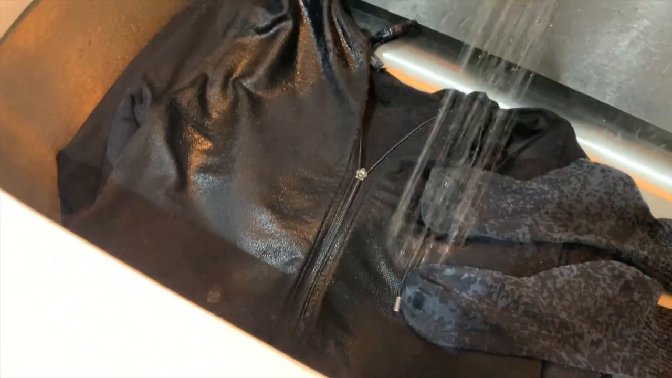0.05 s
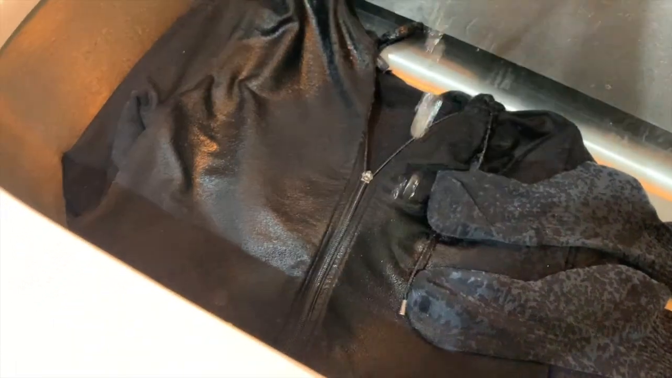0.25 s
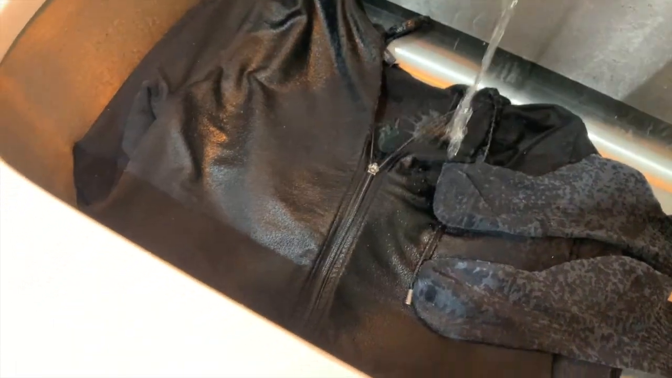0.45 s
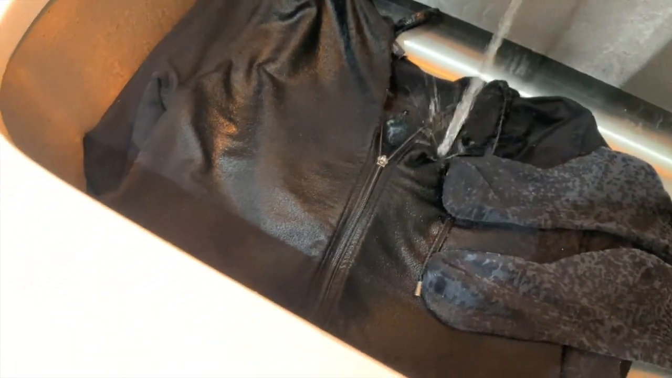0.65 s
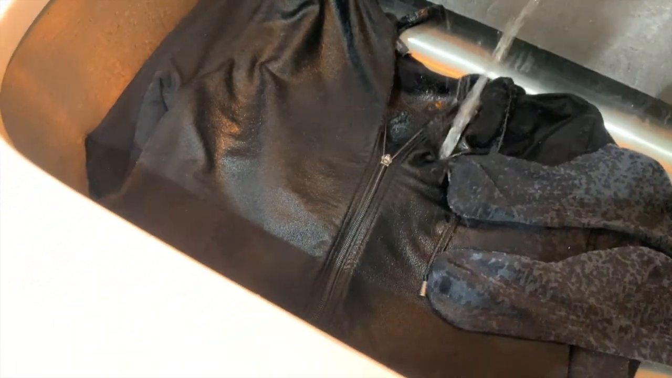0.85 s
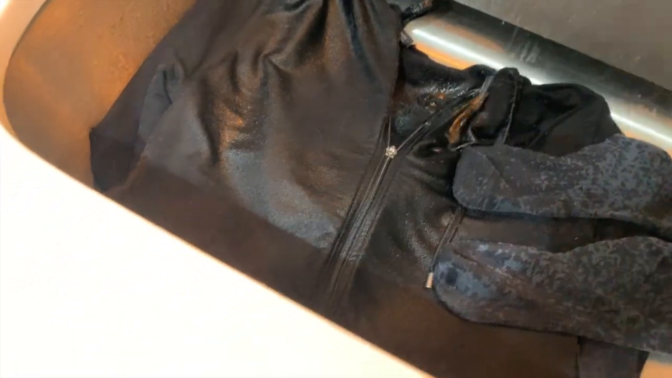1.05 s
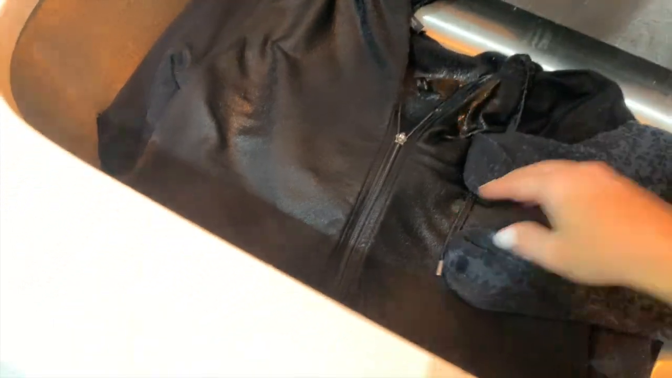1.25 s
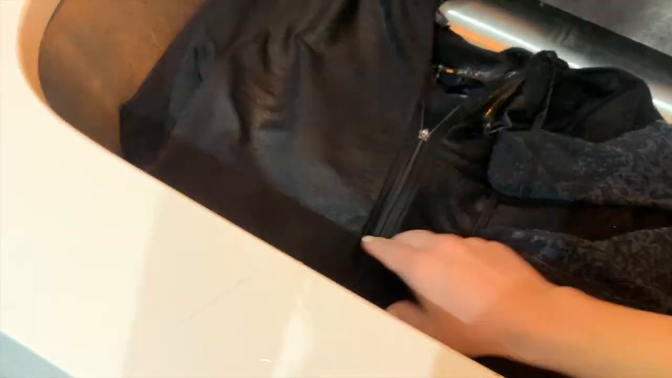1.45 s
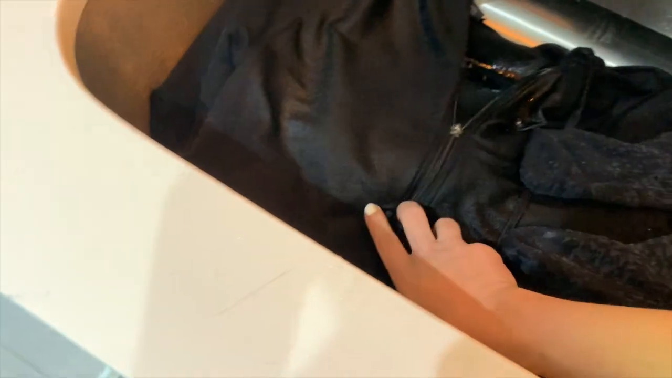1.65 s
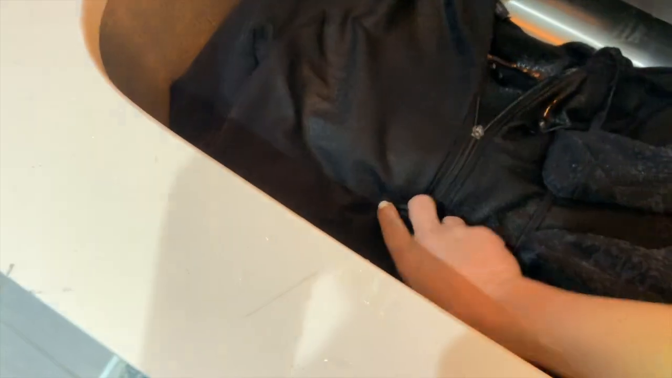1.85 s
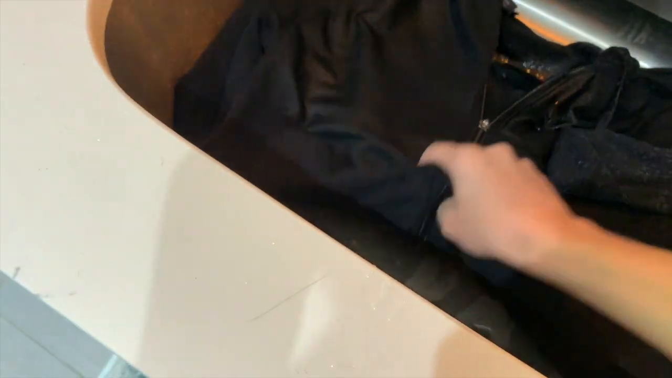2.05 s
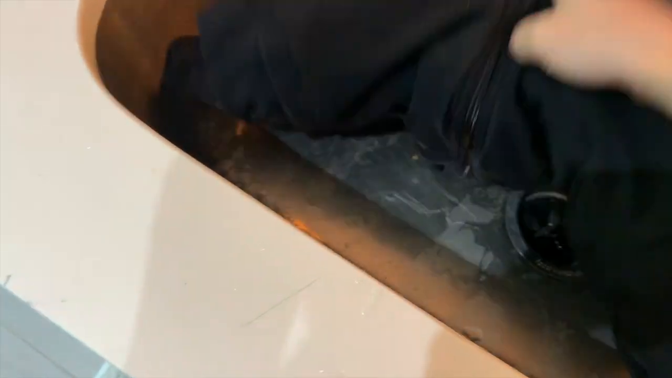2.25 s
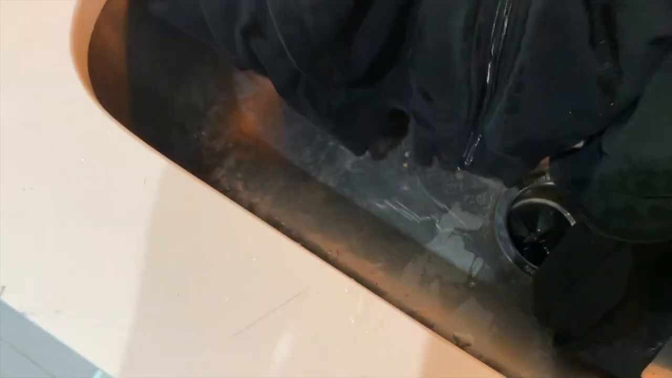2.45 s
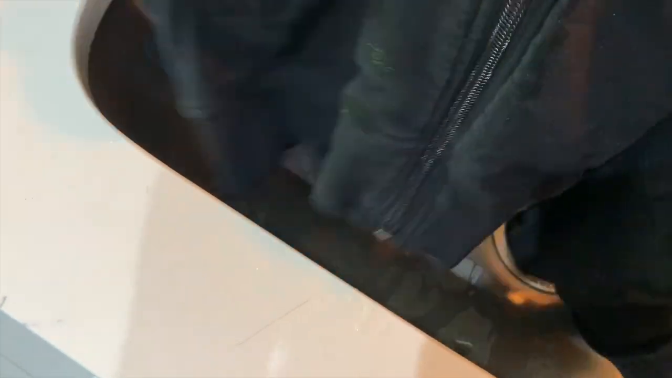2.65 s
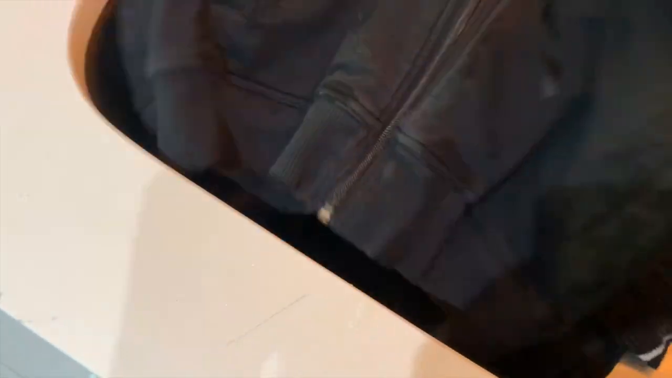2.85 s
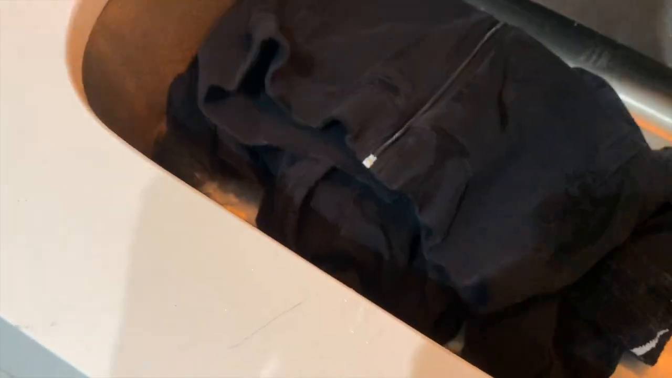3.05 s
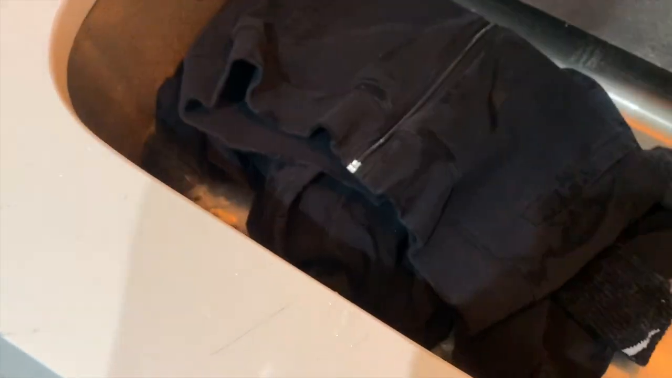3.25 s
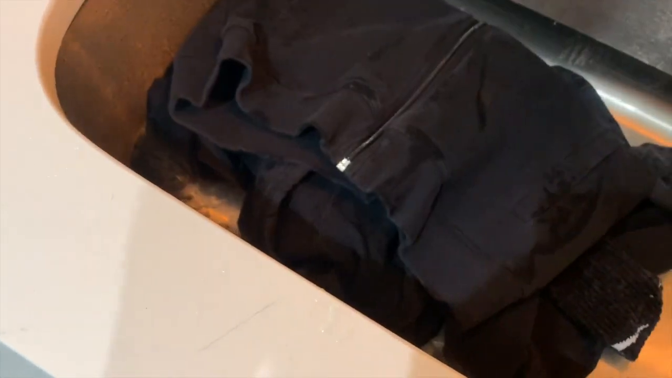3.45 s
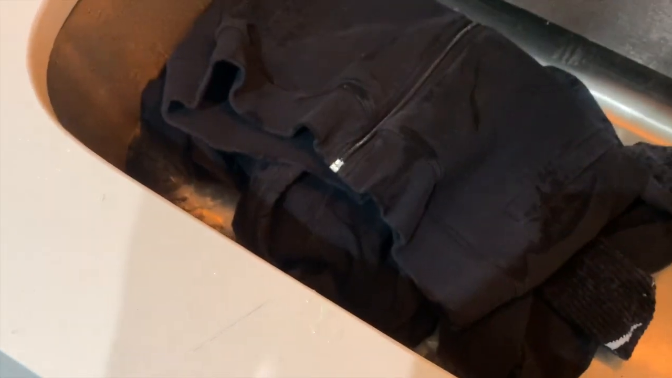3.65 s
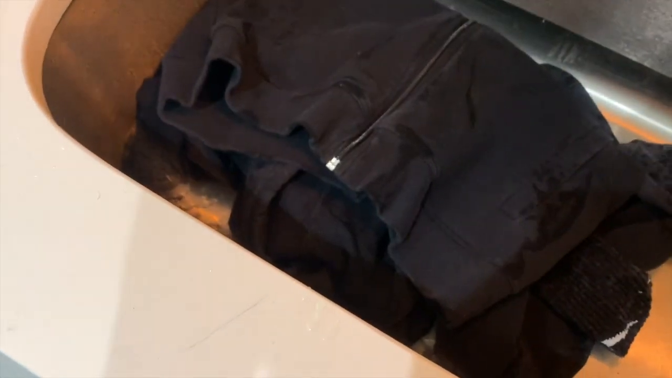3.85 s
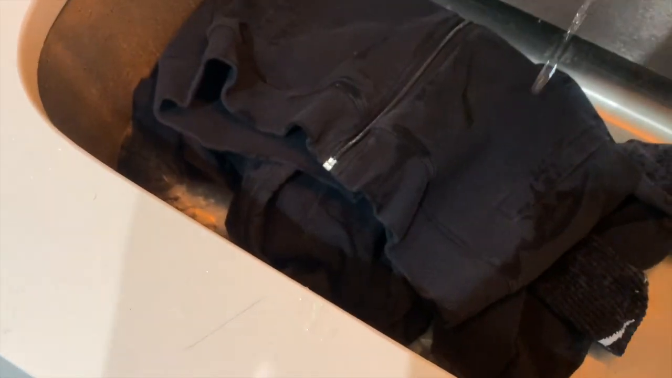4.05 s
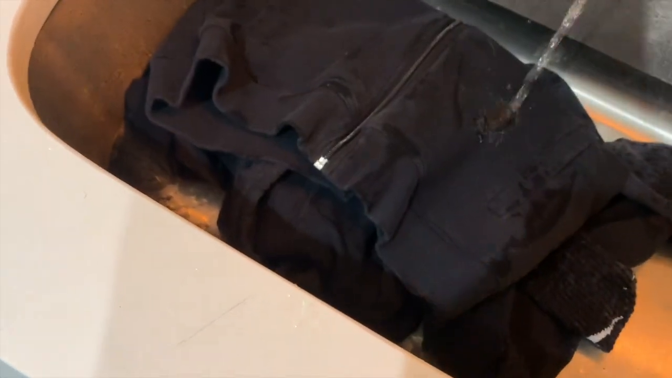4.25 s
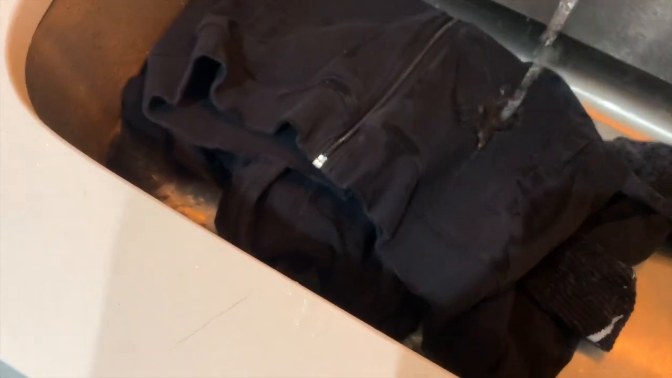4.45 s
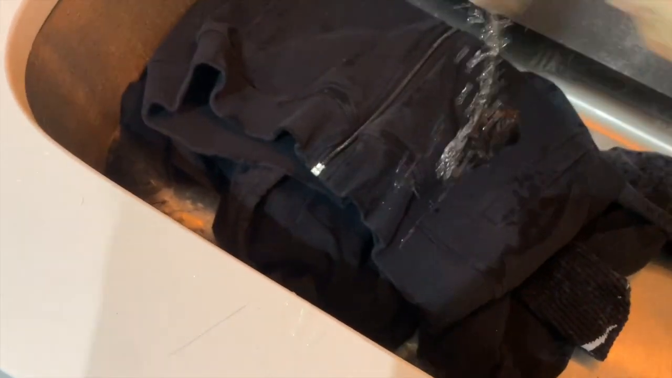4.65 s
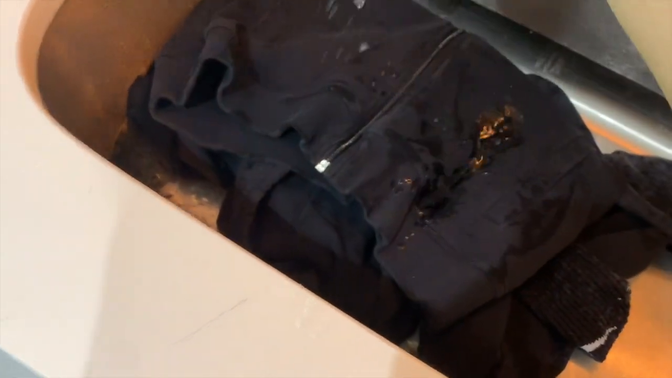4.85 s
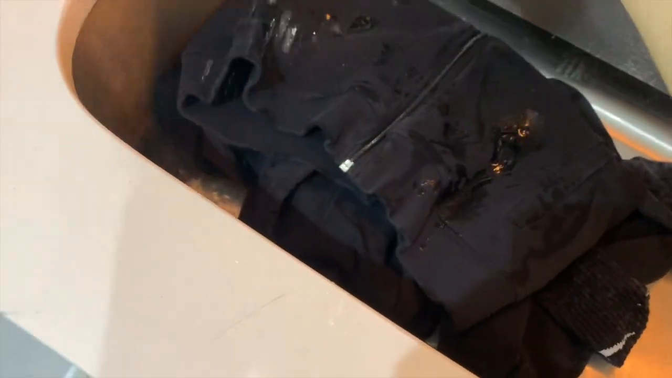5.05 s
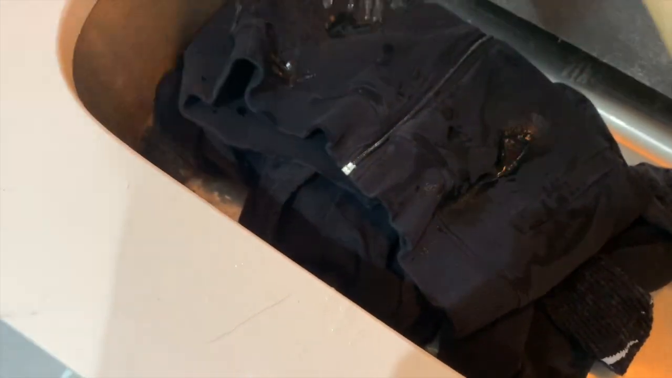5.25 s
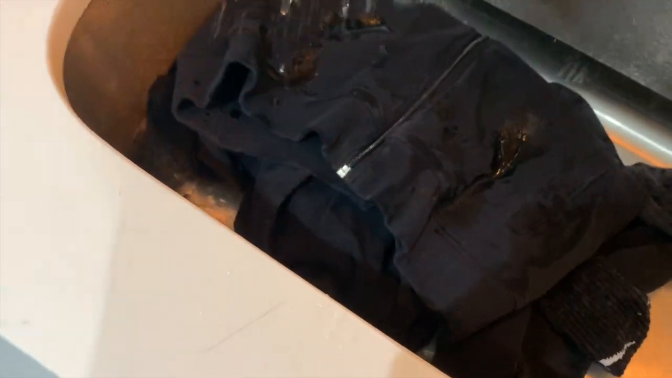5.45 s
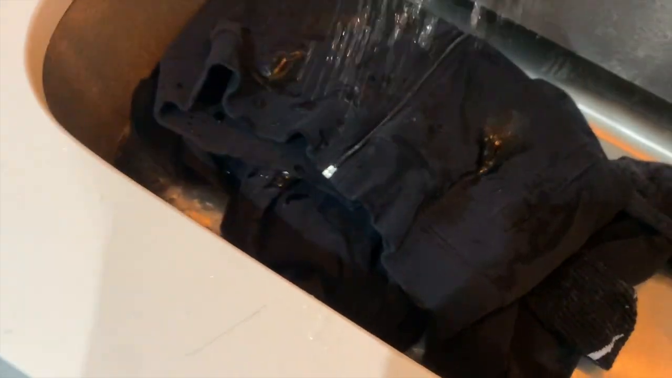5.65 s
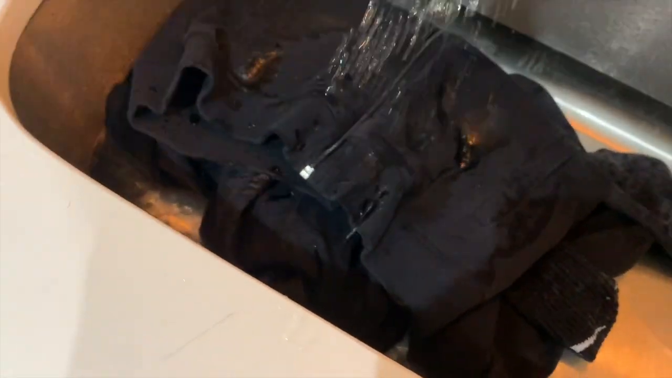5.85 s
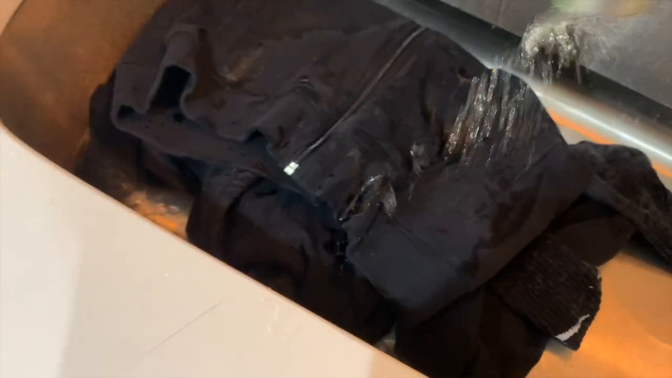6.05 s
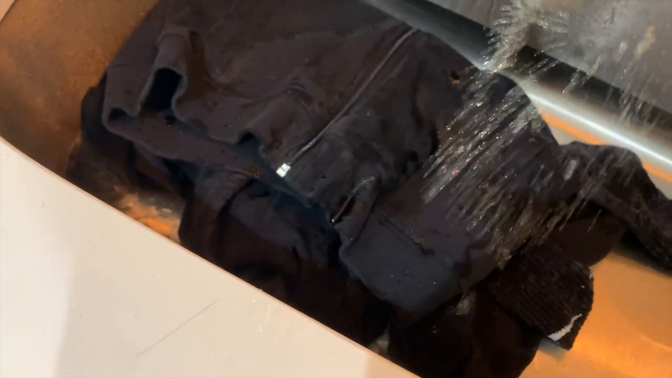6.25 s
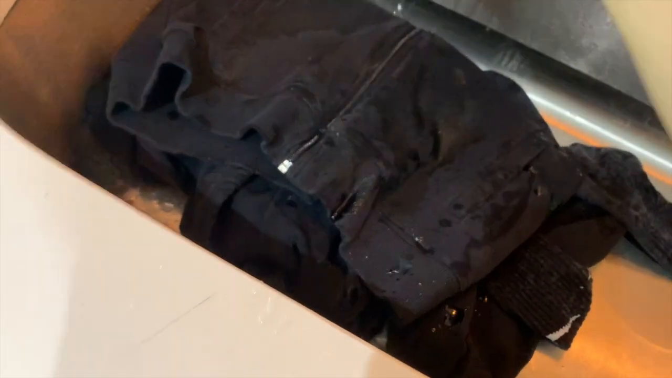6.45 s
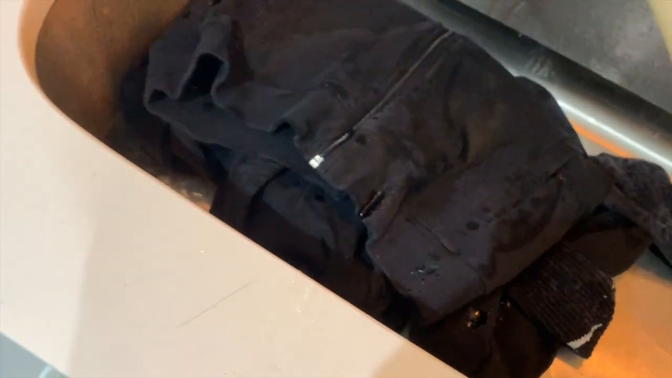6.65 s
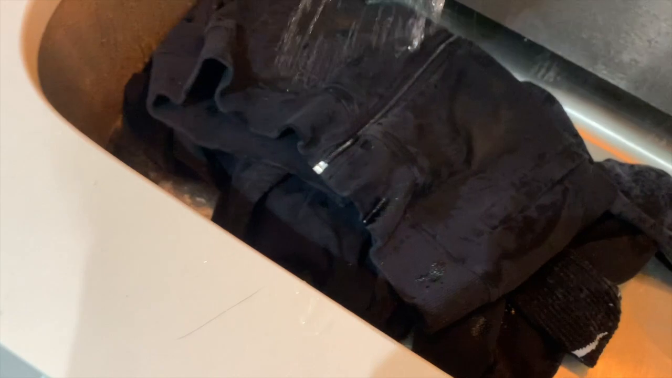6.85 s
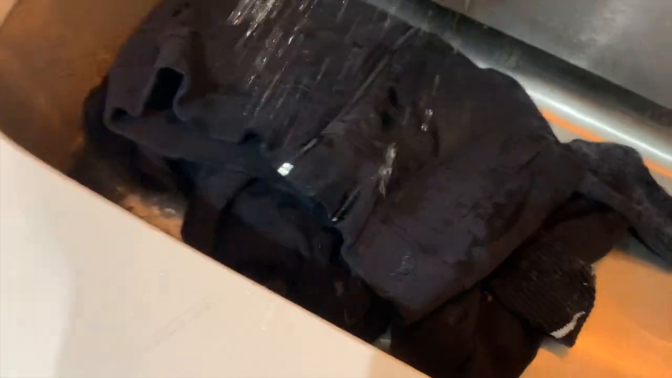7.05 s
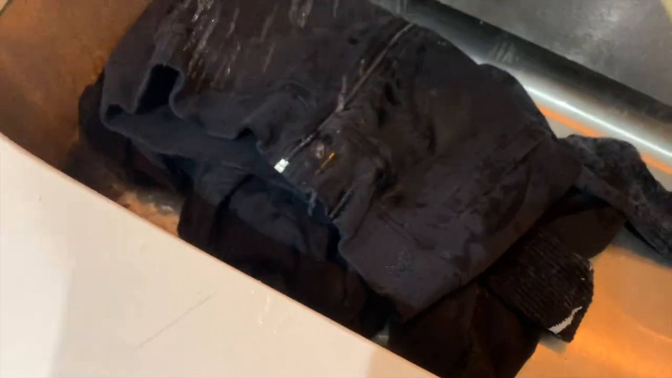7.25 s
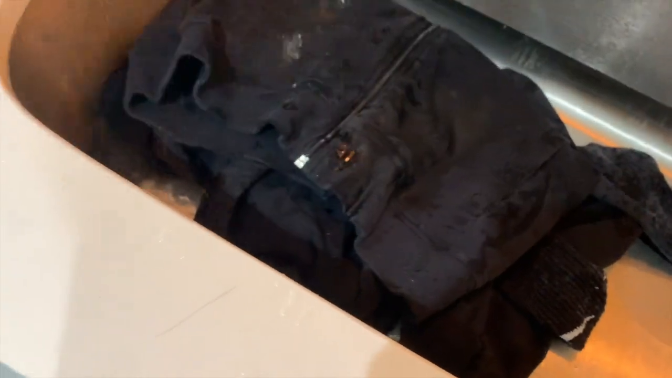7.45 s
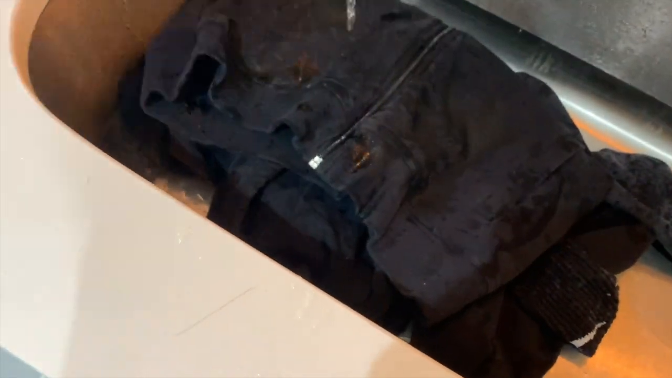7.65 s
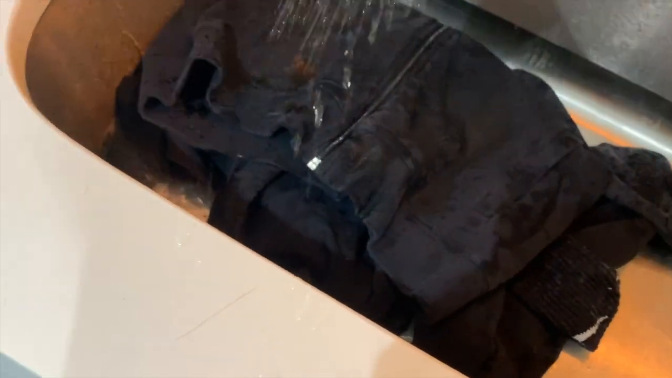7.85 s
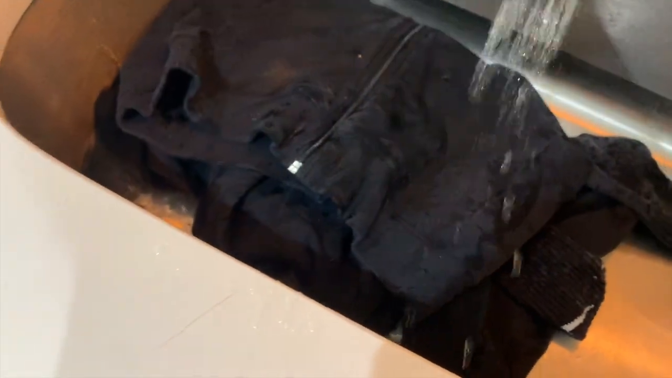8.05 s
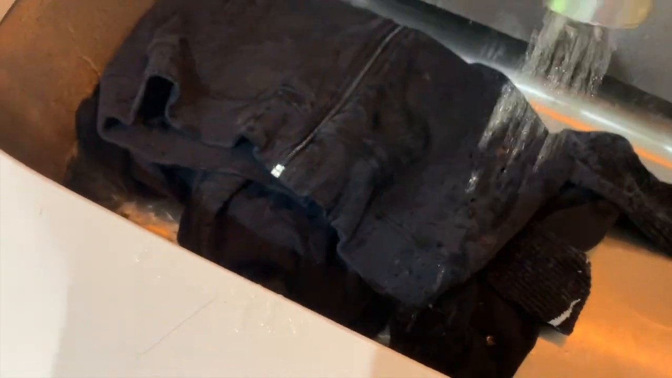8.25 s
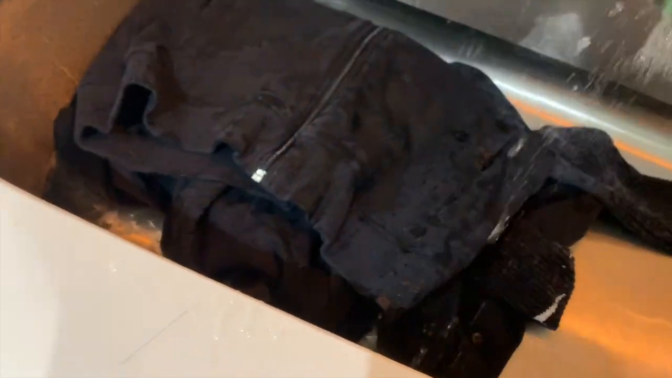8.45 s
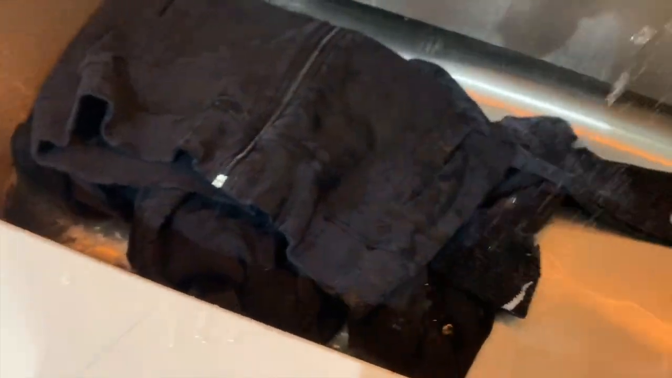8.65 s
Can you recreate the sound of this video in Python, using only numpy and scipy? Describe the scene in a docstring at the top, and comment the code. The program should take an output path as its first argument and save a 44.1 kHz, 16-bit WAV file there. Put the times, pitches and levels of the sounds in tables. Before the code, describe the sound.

Water spray on soaked cloth in a steel sink stops, a heavy wet jacket flops with dull bumps, distant birdsong starts, spraying resumes with gurgles and plops.

```python
"""A hand sprayer wets clothes in a steel kitchen sink: filtered noise hisses like water in its nozzle.
Random drops patter on the cloth and drum on the basin; trapped air bubbles, gurgles and plops as short tones.
The spray is shut off with a few spits; a soaked jacket rustles, bumps the sink (sine modes) and slaps down
(bands of noise), then the spray starts again. Outside, a songbird whistles a run of sliding sine notes,
heard through echoes, over a faint room tone and microphone hiss."""
import sys
import numpy as np
from scipy import signal
from scipy.fft import rfft, irfft
from scipy.io import wavfile

SR = 44100
rng = np.random.default_rng(int(sys.argv[2]) if len(sys.argv) > 2 else 0)


def digitize_waveform(pressure):
    """Quantize a signal to 16-bit integers and store it at the path in sys.argv[1].

    Rows of a 2-D input are taken as channels; values are limited to [-1, 1].
    """
    field = np.atleast_2d(pressure).T
    bounded = np.clip(field, -1, 1)
    quanta = np.round(bounded * 32767).astype(np.int16)
    wavfile.write(sys.argv[1], SR, quanta)


N = 383669
TIME = np.arange(N) / SR                   # seconds
FREQS = np.arange(N // 2 + 1) * SR / N     # Hz


def from_db(db):
    """Turn decibels into a gain."""
    return 10 ** (np.asarray(db) / 20)


def rms_one(x):
    """Scale a sound to unit power."""
    return x / np.sqrt(np.mean(x ** 2) + 1e-20)


def since(start):
    """Count the seconds after a moment, zero before it."""
    return np.maximum(TIME - start, 0)


def gains(rows):
    """Turn each dB column of a table into a gain in time, silent outside its span."""
    seconds, *columns = np.transpose(rows)
    inside = (TIME > seconds[0] - .02) * (TIME < seconds[-1] + .02)
    return [from_db(np.interp(TIME, seconds, column)) * inside for column in columns]


def response(points):
    """Turn a colour table into a gain at every frequency, falling 24 dB an octave past its ends."""
    hz, db = np.transpose(points)
    octave, known = np.log2(FREQS + 1), np.log2(hz)
    beyond = np.abs(octave - np.clip(octave, known.min(), known.max()))
    return from_db(np.interp(octave, known, db) - 24 * beyond)


def noise():
    """Make two unrelated white noises."""
    return rng.standard_normal((2, N))


def drift(rate_hz):
    """Wander smoothly at random: slow noise with unit power."""
    slow = rfft(rng.standard_normal(N)) * np.exp(-(FREQS / rate_hz) ** 2)
    return rms_one(irfft(slow, N))


def impacts(per_s, spread_db):
    """Land drops at random times; with any spread, most are small and a few large."""
    sizes = from_db(spread_db * np.minimum(rng.exponential(1, N), 4))
    landed = rng.random(N) < per_s / SR
    return landed * sizes * rng.choice([-1, 1], (2, N))


# stereo width, narrow in the bass: columns [pitch_hz, side_minus_mid_db]
STEREO_WIDTH = [(30, -12), (70, -11.5), (140, -21.5), (300, -12), (650, -6.5), (1300, -3), (2400, -3),
                (4500, -0.5), (8000, 0.5)]


def coloured(pair, gain):
    """Colour two signals and spread them left and right: alike in the bass, apart in the treble."""
    mid, side = rfft(pair) * gain
    side = side * from_db(np.interp(FREQS, *np.transpose(STEREO_WIDTH)))
    return irfft(np.array([mid + side, mid - side]), N) / np.std(irfft(mid, N))


def echoes(x, t60, cut_hz):
    """Add up scattered reflections, different at each ear; above the cut they die twice as fast."""
    t = TIME[:SR]
    fade = from_db(-60 * t / t60)     # t60: seconds to fall 60 dB
    tail = rng.standard_normal((2, SR)) * fade * (t > .002)
    tail = tail / np.sqrt(np.sum(tail ** 2, axis=1, keepdims=True))
    low_pass = signal.butter(2, 600, fs=SR, output="sos")
    bass_difference = signal.sosfilt(low_pass, tail[0] - tail[1])
    tail = tail + bass_difference * np.array([[-.5], [.5]])     # long waves reach both ears alike
    dull = irfft(rfft(tail) / (1 + (np.arange(SR // 2 + 1) / cut_hz) ** 8), SR)
    tail = dull + (tail - dull) * fade
    return signal.fftconvolve(x, tail, axes=1)[:, :N]


def add(track, start, sound):
    """Mix a sound into a track at a time in seconds."""
    i = max(round(start * SR), 0)
    track[..., i:i + sound.shape[-1]] += sound[..., :N - i]


# whistling cavities of the spray head: columns [pitch_hz, width_hz, first_pour_lift_db, second_pour_lift_db]
NOZZLE_CAVITIES = [(3222, 50, 2.5, 3), (3820, 260, 7.5, 7.5), (4770, 260, 9, 9.5), (5050, 200, 4, 7),
                   (6200, 260, 8, 6.5), (6600, 150, 0, 3), (7390, 130, 4, 3.5), (9030, 260, 13, 8),
                   (12810, 140, 18, 10)]
NOZZLE_LAG_S = 0.0001     # the direct hiss reaches the right microphone this much earlier
SWEEP_HZ = 0.4414         # the hand swings the sprayer to and fro


def jet(spectrum, lifts_db, flutter_db, wall_db):
    """Turbulence hisses through narrow cavities; the steel throws it back, weakly at the top, as the head moves."""
    peaks_db = 0
    for (hz, width_hz, *_), lift_db in zip(NOZZLE_CAVITIES, lifts_db):
        peaks_db = peaks_db + lift_db / (1 + (2 * (FREQS - hz) / width_hz) ** 2)
    source = rng.standard_normal(N) * from_db(flutter_db * drift(51))
    direct = rfft(source) * np.exp(-2j * np.pi * FREQS * np.array([[NOZZLE_LAG_S], [0]]))
    both = np.array([source, source])
    here = echoes(both, t60=.22, cut_hz=16000)
    there = echoes(both, t60=.22, cut_hz=16000)
    turn = 2 * np.pi * SWEEP_HZ * TIME
    wall_gain = from_db(wall_db + np.interp(FREQS, [6500, 8600], [0, -17]))
    walls = rfft(here * np.cos(turn) + there * np.sin(turn)) * wall_gain
    pair = irfft((direct + walls) * response(spectrum) * from_db(peaks_db), N)
    return pair / np.std(pair.mean(0))


# colour of the hiss in each pour, before the cavities lift it: columns [pitch_hz, relative_level_db]
FIRST_HISS_COLOUR = [(500, -7.5), (850, -3), (1300, -9), (1900, 1), (2700, -12), (3500, 1), (4300, -3),
                     (5500, -2.5), (6500, 0), (8200, 10.5), (9600, 2), (11200, 9.5), (12500, 2.5),
                     (15700, -0.5)]
SECOND_HISS_COLOUR = [(1300, -1.5), (2000, -2), (2700, -5.5), (3550, 6), (4300, 1), (5100, 4), (5750, 0.5),
                      (6400, 3.5), (8200, 15.5), (9500, 9.5), (11000, 18), (12500, 10), (13700, 10),
                      (14500, 2.5), (15700, 5)]
# the valve shuts quickly, leaks and spurts for a moment, then seals; the leak is relative to the first jet
FIRST_JET_DB, SHUT_AT_S, SHUT_DB_PER_S = -43.5, 0.658, 354
LEAK_DB, LEAK_S, SEAL_DB_PER_S = -25.5, 0.286, 370
SPURTS_FROM_S, SPURTS_DB, SPURTS_LOSS_DB = .58, 3, 1.5
# it opens again and the pressure builds up; the hiss wavers as the hand moves
SECOND_JET_DB, OPEN_AT_S, PRESSURE_RISE_S = -53, 3.681, 0.16
JET_WAVER_HZ, JET_WAVER_DB = 2.1, 0.46


def nozzle():
    """The first jet breaks into spurts, drops to a leak and seals; the second swells with pressure and holds."""
    _, _, first_db, second_db = np.transpose(NOZZLE_CAVITIES)
    shutting_db = np.maximum(-SHUT_DB_PER_S * since(SHUT_AT_S), LEAK_DB)
    sealing_db = -SEAL_DB_PER_S * since(SHUT_AT_S + LEAK_S)
    spurts_db = (SPURTS_DB * drift(65) - SPURTS_LOSS_DB) * (TIME > SPURTS_FROM_S)
    first_level = from_db(FIRST_JET_DB + shutting_db + sealing_db + spurts_db)
    first = first_level * jet(FIRST_HISS_COLOUR, first_db, flutter_db=2.0, wall_db=12.0)
    pressure = 1 - np.exp(-(since(OPEN_AT_S) / PRESSURE_RISE_S) ** 2)
    second_level = from_db(SECOND_JET_DB + JET_WAVER_DB * drift(JET_WAVER_HZ)) * pressure
    return first + second_level * jet(SECOND_HISS_COLOUR, second_db, flutter_db=1.4, wall_db=8.0)


WHISTLE_HZ, WHISTLE_WIDTH_HZ, WHISTLE_WANDER_HZ = 4780, 100, 25
WHISTLE_DB, WHISTLE_FROM_S, WHISTLE_RISE_S = -59.5, 3.83, 0.092


def whistle():
    """As the second jet reaches full flow, one cavity of the head sings with an airy, wavering tone."""
    hz = WHISTLE_HZ + WHISTLE_WANDER_HZ * drift(2.9)
    churn = np.array([drift(WHISTLE_WIDTH_HZ) + 1j * drift(WHISTLE_WIDTH_HZ) for _ in range(2)])
    swell = 1 - np.exp(-since(WHISTLE_FROM_S) / WHISTLE_RISE_S)
    tone = np.real(churn * np.exp(2j * np.pi * np.cumsum(hz) / SR))
    return from_db(WHISTLE_DB + 4.2 * drift(3.0)) * swell * tone


# air mixes into the dying jet and fizzes: columns [time_s, level_db]
FIZZ_LEVEL = [(.57, -60.5), (.6, -39.5), (.68, -43), (.72, -71), (.84, -50.5), (.94, -57), (.97, -75)]
# colour of the fizz: columns [pitch_hz, relative_level_db]
FIZZ_TONE = [(3500, -5.5), (7000, -3), (10500, -1), (15500, 3.5)]


def fizz():
    """Tiny air bubbles burst at the spray holes while the valve closes."""
    bursts = impacts(per_s=3000, spread_db=3.5)
    return gains(FIZZ_LEVEL)[0] * coloured(bursts, response(FIZZ_TONE))


# air spitting at the nozzle, and sharp drops: columns [start_s, level_db, centre_hz]
NOZZLE_SPITS = [(0.595, -21, 11500), (0.596, -26, 5200), (0.644, -22.5, 12000), (0.679, -23.5, 4950),
                (0.679, -26, 9300), (0.724, -19, 10200), (0.7268, -21, 10300), (0.752, -37, 7500),
                (0.7806, -18.5, 8100), (0.822, -27, 12200), (.842, -26, 12600), (0.855, -28.5, 11100),
                (0.897, -35, 3980), (0.936, -35, 10300), (0.981, -40.5, 2610), (3.604, -45.5, 11160),
                (4.438, -22.5, 13300), (8.286, -31, 12600)]


def spits(decay=0.0012, width=0.077):
    """Tiny pops of noise, each ringing for a moment around its own pitch."""
    out, t = np.zeros((2, N)), TIME[:SR // 20]
    for start, db, hz in NOZZLE_SPITS:
        r = np.exp(-np.pi * width * hz / SR)     # width is a share of the pitch
        w = 2 * np.pi * hz / SR
        burst = rng.standard_normal((2, len(t)))
        pop = signal.lfilter([1, 0, -1], [1, -2 * r * np.cos(w), r * r], burst)
        add(out, start, from_db(db) * rms_one(pop) * np.exp(-t / decay))
    return out


# the stream as the sprayer is moved about, before surges and gushes:
# columns [time_s, force_on_cloth_db, basin_drumming_db]
FIRST_POUR_CURVE = [(0.0, -36, -31.5), (0.09, -41, -45.5), (0.21, -40.5, -41.5), (0.31, -48, -54.5),
                    (0.52, -54.5, -58), (0.7, -48, -48.5), (0.93, -51, -49.5), (1.05, -69.5, -77.5)]
SECOND_POUR_CURVE = [(4.04, -88, -79), (4.12, -60.5, -56), (4.26, -49, -50.5), (4.32, -40.5, -40.5),
                     (4.39, -49.5, -58), (4.44, -35, -37.5), (4.56, -43, -48.5), (4.72, -45.5, -44.5),
                     (4.9, -50, -50.5), (4.98, -59, -60), (5.2, -51, -64.5), (5.68, -50.5, -52),
                     (5.82, -55, -58), (6.2, -55.5, -60), (6.8, -56.5, -65.5), (7.15, -54, -58.5),
                     (7.6, -51, -68), (7.9, -51.5, -63), (7.99, -59, -57), (8.04, -63, -69),
                     (8.1, -51.5, -60), (8.45, -52.5, -67), (8.7, -55, -50)]
# colour of drops on cloth, of the drumming basin and of fine splashes: columns [pitch_hz, relative_level_db]
PATTER_COLOUR = [(110, -39), (190, -9), (237, -6.5), (322, 12.5), (360, -1), (390, 0), (420, -2.5),
                 (473, 9), (505, -1), (1100, -19), (1430, -72), (2420, -120)]
DRUM_COLOUR = [(18, -44.5), (30, -30), (75, -5), (102, -7.5), (123, 4.5), (162, -6), (194, -7), (215, -17),
               (230, -9.5), (300, -18.5), (510, -120)]
SPLASH_COLOUR = [(600, 10), (900, -5), (1800, -5), (3000, -27), (6000, -7.5), (14000, -12)]
SURGE_HZ, SURGE_DB = 12, 3     # the stream lands in surges
# what the force on the cloth sets off, relative to it; droplets are stray drops that tick on the wet cloth
PATTER_DB, BUBBLES_DB, SPLASH_DB, DROPLETS_DB = -8, -7.5, -13, -24.5
GUSH_FORCE_DB, GUSH_DRUM_DB = -1.5, -6.5     # how hard a gush pushes the cloth and the basin


def landing_water():
    """Drops thud into the cloth, shake the basin under it and burst into fine splashes; gushes push all three."""
    surge = from_db(SURGE_DB * drift(SURGE_HZ))
    force, drum = np.add(gains(FIRST_POUR_CURVE), gains(SECOND_POUR_CURVE)) * surge
    gush = gushes()
    force = np.hypot(force, from_db(GUSH_FORCE_DB) * gush)
    drum = np.hypot(drum, from_db(GUSH_DRUM_DB) * gush)
    thuds = from_db(PATTER_DB) * coloured(impacts(per_s=500, spread_db=2.4), response(PATTER_COLOUR))
    blips = from_db(BUBBLES_DB) * bubbles(per_s=150, cycles=18, low_hz=296.4, high_hz=670)
    booms = coloured(impacts(per_s=450, spread_db=1.2), response(DRUM_COLOUR))
    bursts = from_db(SPLASH_DB) * coloured(impacts(per_s=500, spread_db=5.2), response(SPLASH_COLOUR))
    ticks = from_db(DROPLETS_DB) * bubbles(per_s=70, cycles=5, low_hz=800, high_hz=2400)
    return force * (thuds + blips + bursts + ticks) + drum * booms


def bubbles(per_s, cycles, low_hz, high_hz, count=14):
    """Small air pockets close in the cloth and ring for a few cycles, each at one of several pitches."""
    clicks = impacts(per_s, spread_db=2.0)[0]
    dealt = rng.integers(0, count, N)     # which pitch each click rings
    out = 0
    for k, hz in enumerate(np.geomspace(low_hz, high_hz, count)):
        r = from_db(-60 * hz / (cycles * SR))     # falls 60 dB in that many cycles
        w = 2 * np.pi * hz / SR
        mine = clicks * (dealt == k) + 1e-18
        out = out + signal.lfilter([np.sin(w) * low_hz / hz], [1, -2 * r * np.cos(w), r * r], mine)
    return rms_one(out)


# fatter gushes in the stream that plop onto the cloth, level before the swell and the gains that follow:
# columns [start_s, relative_level_db, starting_pitch_hz]
STREAM_GUSHES = [(4.742, -39, 396), (4.889, -45, 336), (4.921, -39, 334), (5.004, -41, 630),
                 (5.092, -39, 455), (5.218, -41, 285), (5.387, -42, 299), (5.501, -38, 293),
                 (5.607, -44, 283), (5.674, -45, 323), (5.954, -42, 474), (6.082, -47, 304),
                 (6.382, -43, 441), (6.439, -42, 474), (6.584, -44, 484), (6.697, -44, 560),
                 (6.767, -44, 501), (6.825, -42, 339), (6.889, -43, 452), (6.922, -42, 283),
                 (7.086, -43, 345), (7.272, -43, 495), (7.363, -44, 326), (7.479, -40, 320),
                 (7.572, -43, 318), (7.638, -42, 463), (7.693, -41, 296), (7.799, -39, 336),
                 (7.889, -40, 323), (8.087, -44, 328), (8.21, -45, 326), (8.319, -42, 307),
                 (8.578, -43, 315), (8.671, -46, 312)]
GUSH_RISE_S, GUSH_DECAY_S = 0.005, 0.018


def gushes():
    """The push of each gush swells quickly and drains away."""
    out, t = np.zeros(N), TIME[:SR // 2]
    swell = (1 - np.exp(-t / GUSH_RISE_S)) * np.exp(-t / GUSH_DECAY_S)
    for start, db, _ in STREAM_GUSHES:
        add(out, start, from_db(db) * swell)
    return out


def gush_plops():
    """Each gush makes the air under the cloth plop."""
    return trapped_air(STREAM_GUSHES, gain_db=-1.5, rise=0.0026, decay=0.0082, glide=0.08)


def trapped_air(rows, gain_db, rise, decay, glide):
    """Air trapped under wet cloth is struck and rings briefly; its pitch climbs as the pocket closes."""
    out, t = np.zeros(N), TIME[:SR // 5]
    swell = (1 - np.exp(-(t / rise) ** 2)) * np.exp(-t / decay)
    for start, db, hz in rows:
        pitch = hz * (1 + glide * (1 - np.exp(-t / decay)))
        add(out, start, from_db(db + gain_db) * swell * np.sin(2 * np.pi * np.cumsum(pitch) / SR))
    return out


# the stream digs a ringing pocket into the wet cloth:
# columns [start_s, length_s, highest_base_pitch_hz, relative_level_db]
CLOTH_GURGLES = [(4.298, 0.064, 696, -56), (4.412, 0.22, 827, -41), (4.449, 0.26, 413, -47.5),
                 (5.002, 0.14, 582, -53.5), (5.21, 0.086, 539, -52.5), (6.531, 0.031, 520, -51.5),
                 (6.697, 0.063, 559, -52), (6.767, 0.16, 537, -55.5), (6.92, 0.2, 394, -57),
                 (7.426, 0.12, 494, -53)]
# resonances of such a pocket: columns [multiple_of_base_pitch, relative_level_db]
POCKET_MODES = [(0.514, -5.5), (0.998, -3.5), (1.534, -16.5)]


def gurgles(width_hz=55, arch=0.1715):
    """Churning water rings a pocket whose pitch rises as it fills and sinks as it spills."""
    out = np.zeros(N)
    for multiple, mode_db in POCKET_MODES:
        churn = drift(width_hz) + 1j * drift(width_hz)
        for start, length, hz, db in CLOTH_GURGLES:
            swell = np.sin(np.pi * TIME[:int(length * SR)] / length)
            pitch = multiple * hz * (1 - arch * (1 - swell))
            phase = 2 * np.pi * np.cumsum(pitch) / SR
            tone = np.real(np.exp(1j * phase) * churn[int(start * SR):][:len(phase)])
            add(out, start, from_db(db + mode_db) * np.sqrt(np.abs(swell)) * tone)
    return out


# soft blows on the basin; the lowest pitch sinks under load and hardness lifts the upper modes:
# columns [start_s, relative_level_db, lowest_pitch_hz, hardness_db]
BASIN_BLOWS = [(0.0, -23, 123, -13), (0.121, -26, 130, -2), (0.21, -18.5, 122, -5.5),
               (0.684, -7.5, 95, -29), (0.76, -33, 101.5, 0), (1.511, -17, 143.7, 0.5),
               (1.531, -16.5, 145, -17), (2.057, -32, 130, -16), (2.653, -23.5, 126, -21),
               (2.709, -20, 128, -18), (2.795, -11.5, 126, -30), (2.858, -34.5, 141, 25),
               (2.885, -19, 135, -15), (2.974, -15.5, 127.4, -3.5), (3.012, -19, 139, -5),
               (3.326, -36.5, 115.3, 0), (3.367, -21, 122, -15.5), (3.419, -30, 131, -15.5),
               (6.391, -36, 110, -21), (6.455, -44, 148.6, 7), (6.775, -49, 139, 2),
               (6.883, -36, 113.6, -1), (7.079, -41, 111, -3), (7.575, -45, 120, -3), (8.075, -40, 126, -3),
               (8.135, -43, 122, -4), (8.309, -33, 132, -37), (8.42, -45, 143, -16), (8.56, -39, 125, -18),
               (8.626, -33, 112, -21)]
# ring of the loaded basin: columns [multiple_of_lowest_pitch, relative_level_db, time_to_fall_60_db_s]
BASIN_RING = [(1, 5.5, 0.1), (1.75, -6.5, 0.061), (2.3, -10.5, 0.11), (2.93, -19.5, 0.28),
              (3.4, -11, 0.098), (4.19, -26.5, 0.24), (5.7, -33, 0.15)]
# rise of the lowest mode at zero hardness; harder blows rise faster, in dB of speed for each dB of hardness
THUMP_RISE_S, RISE_FOLLOWS = 0.012, 0.31


def basin():
    """The steel bottom swings up under a soft blow; wet cloth damps it quickly."""
    out, t = np.zeros(N), TIME[:SR // 2]
    for start, db, hz, hardness_db in BASIN_BLOWS:
        rise = THUMP_RISE_S * from_db(-RISE_FOLLOWS * hardness_db)
        for k, (multiple, mode_db, t60) in enumerate(BASIN_RING):
            swell = 1 - np.exp(-(t * multiple / rise) ** 2)
            upper_db = (k > 0) * (hardness_db + rng.normal(0, 0.56))
            level = from_db(db + mode_db + upper_db - 60 * t / t60)
            add(out, start, level * swell * np.sin(2 * np.pi * hz * multiple * t) * (-1) ** k)
    return out


# wet slaps and splashes, levels before the common gain:
# columns [start_s, body_relative_db, splash_relative_db, spray_relative_db, decay_s]
WET_SLAPS = [(0.1, -22.5, -33, -54, 0.0092), (0.192, -20, -19, -27.5, 0.0051),
             (1.508, -35, -44.5, -49.5, 0.012), (1.883, -39.5, -58, -58, 0.0085),
             (1.924, -31, -39.5, -54, 0.0066), (1.947, -36, -37, -49, 0.0023),
             (2.635, -47, -56.5, -56.5, 0.026), (2.689, -34.5, -60.5, -62, 0.014),
             (2.789, -40, -67, -78, 0.0046), (2.854, -11, -20.5, -8, 0.006),
             (2.863, -51, -39.5, -36.5, 0.066), (2.921, -29, -46, -24, 0.005),
             (2.953, -26, -42, -31, 0.0096), (2.968, -16, -23, -22.5, 0.0037),
             (2.975, -22.5, -47, -39, 0.013), (2.993, -15.5, -25.5, -34.5, 0.0024),
             (4.286, -44, -15.5, -28, 0.0015), (4.424, -33, -33, -27.5, 0.01),
             (4.451, -46, -46.5, -47, 0.15), (5.008, -34, -53, -66, 0.0023), (5.218, -46, -51, -60, 0.0022),
             (5.386, -60, -44.5, -42, 0.0064), (5.547, -31, -49, -62, 0.0031),
             (5.953, -35, -55, -64, 0.0022), (6.306, -45, -52, -47, 0.027),
             (6.378, -39.5, -46.5, -53, 0.016), (7.235, -53, -51.5, -66, 0.021),
             (7.282, -32.5, -55, -66, 0.0033), (7.57, -37, -51, -65, 0.003),
             (7.792, -38, -45.5, -55, 0.0066), (7.89, -36, -53, -68, 0.004)]
# colours of body, splash and spray, one list each: columns [pitch_hz, relative_level_db]
SLAP_COLOURS = [
    [(100, -3), (250, -3), (420, -7), (600, -7), (900, -13.5), (2000, -73)],
    [(400, -19), (850, -1), (2200, -3.5), (3500, -8.5), (8000, -24.5)],
    [(1500, -13), (3800, 6), (7000, 1.5), (10000, 5.5), (15500, 1)],
]


def slaps(attack=0.0014):
    """Wet cloth or a gush lands: a dull body, a splash and a fine spray of droplets, dying together."""
    out, t = 0, TIME[:SR // 2]
    for k, colour in enumerate(SLAP_COLOURS):
        force = np.zeros(N)
        for start, *levels_db, decay in WET_SLAPS:
            add(force, start, from_db(levels_db[k]) * (1 - np.exp(-t / attack)) * np.exp(-t / decay))
        out = out + force * coloured(impacts(per_s=14000, spread_db=0), response(colour))
    return from_db(-4.5) * out


# hollow knocks of the soaked cloth, struck by the hand or the stream or dropped, level before a common gain:
# columns [start_s, relative_level_db, starting_pitch_hz]
CLOTH_KNOCKS = [(0.195, -23.5, 953), (0.203, -28, 565), (1.506, -32, 514), (1.832, -37.5, 310),
                (1.884, -36, 263), (1.923, -32, 443), (1.946, -32, 443), (1.959, -37, 386),
                (2.787, -39, 515), (2.856, -22, 607), (2.859, -18.5, 332), (2.968, -26, 630),
                (2.969, -31.5, 945), (2.983, -24.5, 342), (2.994, -30.5, 476)]


def knocks():
    """Air trapped in the soaked cloth gives a short hollow knock."""
    return trapped_air(CLOTH_KNOCKS, gain_db=-1.5, rise=0.00073, decay=0.008, glide=0.017)


# speed of cloth sliding over cloth and steel, given as its level: columns [time_s, level_db]
RUSTLE_LEVEL = [(1.1, -88), (1.3, -74), (1.49, -69), (1.55, -57), (1.75, -72.5), (1.95, -65.5), (2.07, -70),
                (2.2, -63.5), (2.65, -66.5), (3.05, -56), (3.22, -90)]
# colour of the rustle: columns [pitch_hz, relative_level_db]
CLOTH_COLOUR = [(300, -13.5), (500, 8.5), (1000, -4.5), (1800, -12), (3000, -11), (5500, -15.5),
                (13000, -20), (15500, -25)]


def handling():
    """Wet fabric rustles as it is gripped, lifted and dropped: a dense crackle of tiny impacts."""
    return gains(RUSTLE_LEVEL)[0] * coloured(impacts(per_s=9500, spread_db=0.5), response(CLOTH_COLOUR))


# the upward slide of the first note, before its warble: columns [time_after_note_start_s, pitch_hz]
NOTE_SLUR = [(0, 2072), (.018, 2165), (.036, 2774), (.062, 3180), (.105, 3555)]
# the run slows a little and grows to full voice; levels are before the echoes and a small chance per note
SONG_AT_S, NOTE_EVERY_S, SLOWING_S = 3.208, .227, .001
FIRST_NOTE_DB, GROWTH_DB_PER_NOTE, FULL_VOICE_DB = -61, 1.1, -53


def bird(length=0.1, sag=0.00389, quickening=0.0237, warble=0.014, count=13):
    """Slightly husky upslurs that sag and steepen along the run, heard only as echoes between walls."""
    out, t = np.zeros((2, N)), TIME[:SR // 5]
    waver = 1 + warble * drift(150)
    for k in range(count):
        start = SONG_AT_S + k * (NOTE_EVERY_S + k * SLOWING_S)
        db = min(FIRST_NOTE_DB + k * GROWTH_DB_PER_NOTE, FULL_VOICE_DB) + rng.normal(0, 1.2)
        into = t * (1 + quickening * k)     # later notes run through the slur faster
        swell = np.sqrt(np.abs(np.sin(np.pi * np.minimum(into / length, 1))))
        slur = np.interp(into, *np.transpose(NOTE_SLUR))
        hz = slur * (1 - sag * k) * waver[int(start * SR):][:len(t)]
        add(out, start, from_db(db) * swell * np.sin(2 * np.pi * np.cumsum(hz) / SR))
    through_window = echoes(out, t60=.2, cut_hz=8000)
    between_walls = echoes(out, t60=.85, cut_hz=8000)
    return from_db(-11) * through_window + from_db(-3) * between_walls


# the background swells and dips: columns [time_s, level_db]
BACKGROUND_LEVEL = [(0, -46.5), (.9, -61), (1.06, -69), (1.22, -63), (2.1, -55), (2.6, -60.5), (3.25, -63),
                    (3.7, -60.5), (4.1, -60.5), (8.7, -63.5)]
# colour of the background: columns [pitch_hz, relative_level_db]
BACKGROUND_COLOUR = [(15, -43), (25, -25.5), (50, -0.5), (120, -4), (197, -12.5), (306, 0), (359, 0),
                     (520, -17), (620, -14.5), (800, -20.5), (1050, -30), (1350, -26.5), (1900, -22.5),
                     (3000, -37.5), (3900, -66), (6600, -120)]
MIC_HISS_DB = -82.5


def room_tone():
    """A dull noise fills the room, with a faint steady microphone hiss on top."""
    background = gains(BACKGROUND_LEVEL)[0] * coloured(noise(), response(BACKGROUND_COLOUR))
    return background + from_db(MIC_HISS_DB) * noise()


def scene():
    """Sharp sounds ring in the steel walls and, with the thumps, in the kitchen; the rest is mixed in."""
    sharp = slaps() + spits() + knocks()
    sharp = sharp + from_db(-9.0) * echoes(sharp, t60=0.1, cut_hz=11000)
    thumps = basin()
    kitchen = from_db(-11.0) * echoes(sharp + from_db(-1.5) * thumps, t60=0.54, cut_hz=7100)
    water = landing_water() + gurgles() + gush_plops()
    sink = water + sharp + thumps + handling()
    return nozzle() + fizz() + whistle() + sink + kitchen + bird() + room_tone()


# colour of the microphone pair: columns [pitch_hz, left_minus_right_db]
PAIR_BALANCE = [(130, 0.5), (300, 3), (800, 1), (1800, 4), (3600, 0.5), (5000, 0.5), (6300, -2), (8000, 1)]
# how much of the left treble is the right signal, a little late: columns [pitch_hz, share_0_to_1]
SHARED_TREBLE = [(6000, 0), (7500, .5), (8400, .97)]
TREBLE_LAG_S = 0.000297


def microphones(x):
    """Each side has its own colour; the treble is nearly one signal that reaches the left late."""
    balance_db = np.interp(FREQS, *np.transpose(PAIR_BALANCE))
    left, right = rfft(x) * from_db(balance_db * np.array([[.5], [-.5]]))
    share = np.interp(FREQS, *np.transpose(SHARED_TREBLE))
    late_right = right * np.exp(-2j * np.pi * FREQS * TREBLE_LAG_S)
    left = np.sqrt(1 - share ** 2) * left + share * late_right
    return irfft(np.array([left, right]), N)


CUTOFF_HZ = 16000


def record(dry):
    """The microphones colour the sound, the highest peaks are rounded and the top is cut steeply."""
    rounded = .6 * np.tanh(microphones(dry) / .6)
    steep_cut = signal.ellip(10, .2, 80, CUTOFF_HZ, fs=SR, output="sos")
    return signal.sosfilt(steep_cut, rounded)


dry = scene()
out = record(dry)
digitize_waveform(out)
```